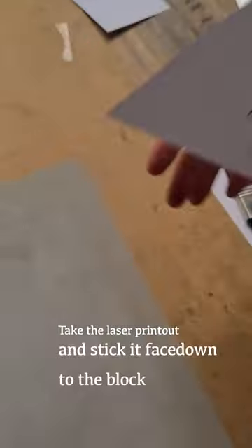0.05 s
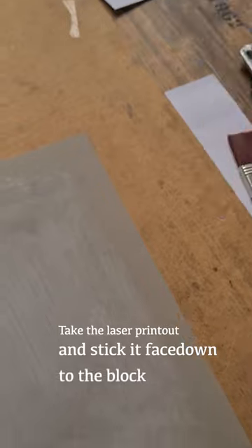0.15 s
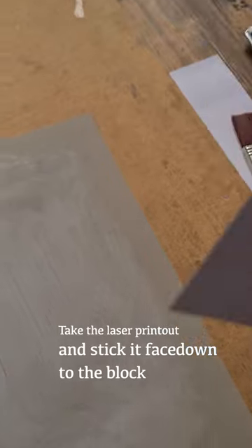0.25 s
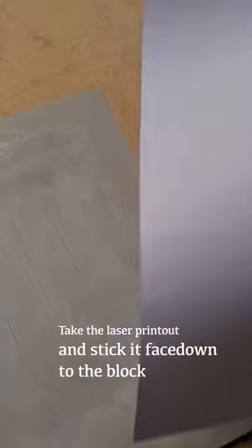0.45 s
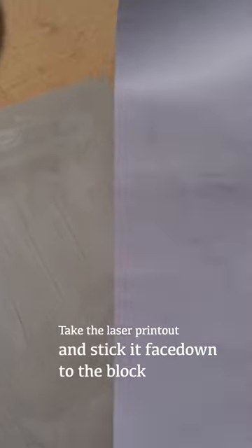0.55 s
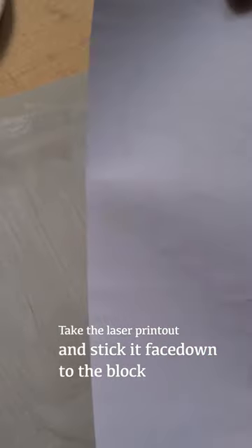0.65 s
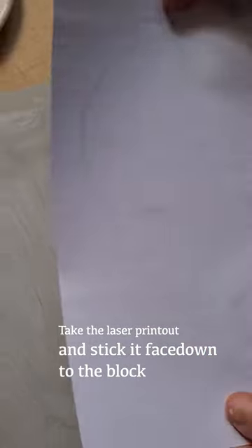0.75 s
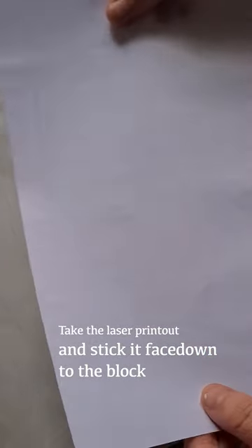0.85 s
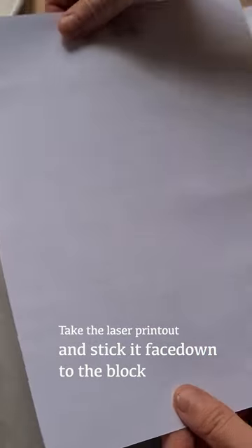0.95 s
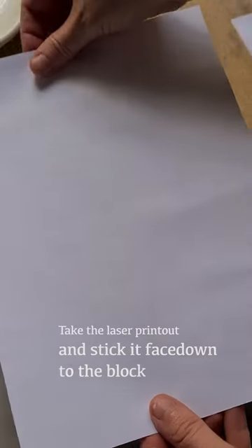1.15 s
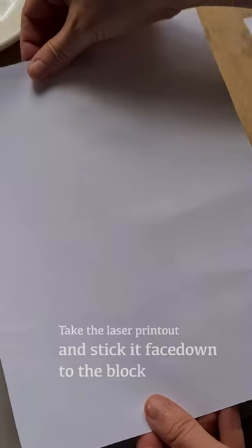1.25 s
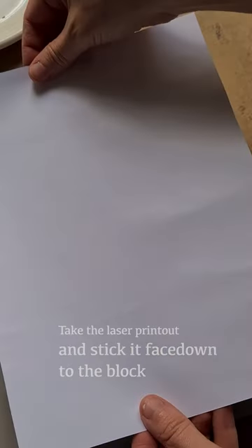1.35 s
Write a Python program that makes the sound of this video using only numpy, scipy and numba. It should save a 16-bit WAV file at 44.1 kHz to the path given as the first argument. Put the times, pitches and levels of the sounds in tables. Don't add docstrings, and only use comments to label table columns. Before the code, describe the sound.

Paper handling: a stiff sheet rustles, creases snap sharply, then it settles softly onto a block.

```python
import sys
import numpy as np
from scipy import signal
from scipy.fft import rfft, irfft
from scipy.io import wavfile
from scipy.ndimage import uniform_filter1d, map_coordinates
from numba import njit

SR = 44100
rng = np.random.default_rng(int(sys.argv[2]) if len(sys.argv) > 2 else 0)


def inscribe(sig):
    pcm = np.round(np.clip(np.atleast_2d(sig).T, -1, 1) * 32767)
    wavfile.write(sys.argv[1], SR, pcm.astype(np.int16))


def ratio_of_db(decibels):
    return 10 ** (np.asarray(decibels, float) / 20)


N = 61739


def curve(table, column):
    return np.interp(np.arange(N) / SR, np.array(table)[:, 0], np.array(table)[:, column])


def walk(rate):
    k = int(SR / rate)
    steps = np.repeat(rng.standard_normal(N // k + 1), k)
    return 1.44 * uniform_filter1d(uniform_filter1d(steps, k), k)[:N]


def coloured(x, points):
    hz = np.maximum(np.arange(N // 2 + 1) * SR / N, 1)
    corner_hz, db = np.array(points).T
    y = irfft(rfft(x) * ratio_of_db(np.interp(np.log(hz), np.log(corner_hz + 1), db)), N)
    return y / np.sqrt(np.mean(y ** 2))


def high(x, hz):
    return signal.sosfilt(signal.butter(2, hz, "high", fs=SR, output="sos"), x)


@njit
def band(x, hz, width, sr):
    y, b, l = np.empty(len(x)), 0., 0.
    for i in range(len(x)):
        g, k = np.tan(np.pi * hz[i] / sr), width / hz[i]
        v = (b + g * (x[i] - l)) / (1 + g * (g + k))
        b, l, y[i] = 2 * v - b, l + 2 * g * v, k * v
    return y


def resonance(x, hz, width):
    return band(x, np.full(N, 1. * hz), 1. * width, 1. * SR)


@njit
def ring(centre, hz, cycles, size, n, sr):
    y = np.zeros(n)
    for k in range(len(centre)):
        half = .5 * cycles[k] * sr / hz[k]
        for i in range(max(0, int(centre[k] - half) + 1), min(n, int(centre[k] + half) + 1)):
            d = i - centre[k]
            bell = np.cos(np.pi * d / (2 * half)) ** 2
            y[i] += size[k] * np.sin(2 * np.pi * hz[k] * d / sr + 1) * bell
    return y


def swarm(s, db, hz, rise_ms, fall_ms, spread, cycles, count):
    pitch_sag, level_spread_db = 0.3, 1.5
    u = rng.random((3, len(s), count))
    c = rng.standard_normal((len(s), count))
    rise, fall = 4 * np.abs(rise_ms)[:, None], 4 * np.abs(fall_ms)[:, None]
    ms = (np.arange(count) + u[0]) / count * (rise + fall) - rise
    strength = np.exp(-4 * np.where(ms < 0, -ms / rise, ms / fall))
    even = (np.arange(count) * (np.sqrt(5) - 1) / 2 + u[1, :, :1]) % 1
    pitch = hz[:, None] * strength ** pitch_sag * np.exp(spread * (2 * even - 1))
    pitch = np.clip(pitch, 100, .4 * SR)
    density = np.sqrt((rise + fall) * pitch / 1000 / count / cycles)
    size = ratio_of_db(db[:, None] + level_spread_db * c) * strength * density * np.sign(u[2] - .5)
    size = size * np.cos(np.pi * (even - .5)) ** .5
    at = (s[:, None] + ms / 1000) * SR
    halves = []
    for k in range(2):
        centre = at[:, k::2].ravel()
        halves.append(ring(centre, pitch[:, k::2].ravel(), cycles + 0. * centre,
                           size[:, k::2].ravel(), N, 1. * SR))
    return halves


# f/Hz, level/dB per Hz
ROOM_COLOUR = [
    (40, -1),
    (156, -11.5),
    (300, -10),
    (700, -17.5),
    (2300, -23),
    (7000, -32.5),
    (12700, -43),
    (12900, -85),
]
# t/s, level/dB
HISS_FADE = [
    (0, -1.5),
    (.08, -4.5),
    (.18, -9),
    (.3, 2.5),
    (.95, -1),
    (1.2, -6),
    (1.37, -5.5),
    (1.4, -7.5),
]
# f/Hz, width/Hz, level/dB
ROOM_PATCHES = [
    (1600, 560, -8),
    (2170, 520, 0.5),
    (3500, 890, -3.5),
    (6600, 1000, 1.5),
    (9700, 1300, -9.5),
]


def room():
    mid, side = (coloured(rng.standard_normal(N), ROOM_COLOUR) for _ in range(2))
    side = signal.sosfilt(signal.butter(1, 110, "high", fs=SR, output="sos"), side)
    both = mid + 0.78 * side * np.array([[1], [-1]])
    bass = signal.sosfilt(signal.butter(2, 300, fs=SR, output="sos"), both)
    hiss = both - bass
    patches = 0
    for hz, width, db in ROOM_PATCHES:
        patch = np.array([resonance(x, hz, width) for x in hiss])
        patches = patches + ratio_of_db(db + 5 * walk(18.04)) * patch
    bass = bass * ratio_of_db(1.3 * walk(14.7))
    hiss = (hiss + patches) * ratio_of_db(curve(HISS_FADE, 1) + 1.07 * walk(12.64))
    return ratio_of_db(-57.5) * (bass + hiss)


# t/s, pressure level/dB, air gap f/Hz
SLIDE = [(.2, -100, 2970), (.21, -69, 2960), (.3, -58, 3080), (.34, -56, 3000), (.41, -52.5, 3160),
         (.47, -44, 3250), (.505, -40, 3430), (.53, -60, 3440), (.59, -45.5, 3300), (.75, -45.5, 3290),
         (.88, -46.5, 3980), (.94, -50.5, 4350), (.965, -59, 3900), (1.05, -59, 4000), (1.108, -49.5, 4180),
         (1.125, -62, 3820), (1.3, -57, 4840), (1.36, -72.5, 4600)]
# f/Hz, level/dB per Hz
FIBRE_COLOUR = [
    (250, -7),
    (500, -15.5),
    (1200, -11.5),
    (2200, -12.5),
    (4000, -10.5),
    (7000, -11.5),
    (12000, -19),
    (15600, -26),
]


def slide():
    press = ratio_of_db(curve(SLIDE, 1) + 1.6 * walk(39.76))
    halves = []
    for _ in range(2):
        grit = rng.standard_normal(N) * ratio_of_db(2.2 * walk(400))
        halves.append(press * 0.47 * coloured(grit, FIBRE_COLOUR))
    return halves


# multiple of gap pitch, width/Hz, depth 0-1
NOTCHES = [
    (.68, 410, 0.7),
    (1.4, 630, 0.53),
    (2.4, 940, 0.6),
]


def under_sheet(x):
    hz = curve(SLIDE, 2)
    for multiple, width, depth in NOTCHES:
        x = x - depth * band(x, multiple * hz, 1. * width, 1. * SR)
    gap = band(x, hz, 520., 1. * SR)
    edge_hz = 6090 * (hz / 3320) ** 0.31
    edge = band(x, edge_hz, 590., 1. * SR)
    gap_level, edge_level = ratio_of_db(-0.5 + 3 * walk(60.1)), ratio_of_db(-2 + 3 * walk(60))
    return ratio_of_db(1.0) * (x + gap_level * gap + edge_level * edge)


CREASE_SPREAD, CREASE_CYCLES = 0.97, 4.5
# t/s, level/dB, f/Hz, fall/ms
TICKS = [(0.206, -42, 4230, 6.2), (.277, -40, 2280, 2.7), (0.2808, -30, 4060, 0.76), (0.354, -36, 3180, 4),
         (0.4949, -21, 4360, 4.1), (0.502, -23.5, 3850, 2.5), (0.508, -22, 3360, 5.14),
         (.547, -29, 3800, 1.04), (0.554, -25.5, 4540, 1.76), (.558, -28.5, 4130, 2),
         (.585, -35, 4000, 2.1), (0.61, -46, 9000, 0.92), (.81, -32, 3800, 1.2), (.978, -41, 3570, 4),
         (0.984, -38, 2920, 1.5), (1.058, -38.5, 4770, 1.6), (1.1143, -34, 5370, 0.98)]


def ticks():
    s, db, hz, fall_ms = np.array(TICKS).T
    rise_ms = 0.3975 + 0 * s
    return swarm(s, db, hz, rise_ms, fall_ms, CREASE_SPREAD, CREASE_CYCLES, count=160)


# t/s, peak level/dB, f/Hz, cycles
SNAPS = [(0.2078, -37.5, 160, 1.1), (.2155, -36, 2960, 6), (.218, -32.5, 1100, 3.4),
         (.2243, -28, 1990, 7.4), (.281, -40, 3000, 4), (.347, -41, 1300, 6.9), (.354, -36, 800, 1.6),
         (.3593, -29.5, 900, 1.5), (0.3647, -23, 1280, 4.8), (0.3644, -31.5, 383, 2.84),
         (.3697, -37, 704, 1.5), (.373, -35, 4000, 4), (.3748, -26, 1100, 2.2), (.389, -38.5, 2420, 8),
         (0.4951, -20, 6160, 8.2), (0.495, -22, 3180, 1.8), (0.4957, -28, 9260, 18), (.498, -28, 1460, 8.6),
         (.5025, -28, 4300, 4), (.5056, -29.5, 3000, 2.4), (.508, -22, 3500, 4.5), (.5125, -27, 2800, 6.6),
         (.518, -32, 1720, 5.5), (.554, -28, 3400, 2.5), (0.5541, -35.5, 6400, 7.3),
         (.559, -33.5, 3500, 12), (0.609, -29.5, 495, 1.8), (.609, -40, 1820, 5), (.619, -32, 700, 1.6),
         (.639, -27.5, 386, 3.5), (0.6384, -23.5, 1200, 3.1), (.6405, -27, 3000, 5.8),
         (0.6408, -27, 1900, 3.7), (.648, -27, 600, 2.5), (0.654, -29.5, 1500, 5), (.81, -37, 3070, 6.5),
         (.81, -37, 6400, 6.2), (0.915, -35, 1155, 10.7), (0.9855, -38, 2740, 8.2), (0.98, -46, 4100, 13),
         (0.9819, -39.5, 1300, 8.5), (0.9808, -45, 9200, 32), (.998, -50, 1200, 16), (.555, -42, 480, 4.3),
         (.484, -40, 1500, 19), (.626, -34, 600, 8), (.319, -47, 3000, 30), (.645, -35, 3600, 9),
         (1.058, -44, 5630, 8.9), (1.116, -44, 5870, 9.8)]


def snaps(low):
    s, db, hz, cycles = np.array(SNAPS).T
    return ring(s * SR, hz, cycles, ratio_of_db(db) * ((hz < 2000) == low), N, 1. * SR)


# t/s, level/dB, f/Hz
THUMPS = [(0.209, -45, 108.6), (.284, -53, 89), (0.35, -45.5, 112), (0.378, -43, 75.6), (.405, -50, 150),
          (0.476, -51, 71), (0.507, -48, 120), (0.591, -41.5, 66.6), (0.626, -36.5, 103), (0.757, -48, 83),
          (0.913, -53.5, 99), (.975, -53, 62), (1.035, -53, 55), (1.089, -53, 57), (1.16, -54, 60),
          (1.269, -55, 95), (1.33, -56, 70), (1.375, -58, 210)]


def thumps():
    s, db, hz = np.array(THUMPS).T
    late_s, cycles = 0.0113, 2
    puffs = ring((s + late_s) * SR, hz, cycles + 0. * s, ratio_of_db(db), N, 1. * SR)
    return puffs * ratio_of_db(np.array([[2.2], [-2.2]]))


# t/s, level/dB, top f/Hz, rise/ms, fall/ms
FLAPS = [(0.216, -24.5, 2340, 2.29, 10.5), (.255, -45, 1780, 8.6, 9.4), (0.226, -37, 460, 5.1, 13),
         (0.346, -38.5, 1300, 1.34, 3.9), (0.356, -26, 1300, 3.01, 3.75), (.631, -23.5, 920, 5, 2.93),
         (.374, -29, 1300, 5.5, 7), (0.39, -28, 2250, 3.6, 6.9), (.515, -30.5, 495, 8, 8),
         (0.497, -30.5, 2200, 1.27, 5.5), (.515, -28.5, 1900, 4, 5.7), (0.597, -30, 600, 8.1, 9.8),
         (0.609, -27, 1310, 2.2, 3.55), (.619, -26.5, 1010, 4, 8), (0.64, -22.5, 2670, 2.5, 5.1),
         (.651, -25, 1500, 4.5, 6.5), (0.665, -30, 696, 7.3, 10.7), (.746, -33.5, 860, 10.3, 4.5),
         (.758, -20.5, 1900, 2.46, 4.86), (0.766, -25.5, 1300, 1.98, 6.1), (.778, -34, 1070, 3.54, 9),
         (0.81, -34.5, 1120, 1.17, 3.26), (0.917, -31.5, 1230, 1.49, 4.23),
         (.93, -43, 775, 4.36, 10),
    (.981, -39, 1500, 2.1, 5.15),
    (.999, -40.5, 1110, 3.7, 5),
]
# f/Hz, width/Hz, level/dB
SHEET_MODES = [
    (455, 100, 1.5),
    (600, 25.5, 4),
    (1130, 290, 0.5),
    (1599, 67, 0),
    (2120, 370, 4),
]


def flaps():
    s, db, hz, rise_ms, fall_ms = np.array(FLAPS).T
    halves = []
    for x in swarm(s, db, hz, rise_ms, fall_ms, spread=0.94, cycles=3.4, count=240):
        modes = sum(ratio_of_db(level) * resonance(x, f, width) for f, width, level in SHEET_MODES)
        halves.append(x + modes)
    return halves


# t/s, level/dB, f/Hz, rise/ms, fall/ms
SCRAPES = [
    (.488, -36.5, 4500, 11, 6),
    (0.23, -43, 2560, 1.9, 5),
    (1.108, -45.5, 4900, 14, 3),
    (.979, -39.5, 6700, 4, 4),
]


def scrapes():
    return swarm(*np.array(SCRAPES).T, CREASE_SPREAD, CREASE_CYCLES, count=400)


# t/s, lead of left port/ms, left over right level/dB
PLACE = [
    (0, 0.41, 19),
    (.27, 0.31, -4.5),
    (.45, 0.27, 6),
    (.7, 0.28, 0),
    (.93, 0.3, 2),
    (1.03, -0.3, 2),
    (1.12, -0.31, -2),
    (1.17, 0.14, 3),
    (1.4, 0.099, 1.5),
]


def ports(halves, middle, share):
    whole = halves[0] + halves[1] + middle
    apart = ratio_of_db(-4.5) * high(halves[0] - halves[1], 600)
    lead, i = share * curve(PLACE, 1) * SR / 2000, np.arange(N)
    left = map_coordinates(whole + apart, [i + lead], mode="mirror")
    right = map_coordinates(whole - apart, [i - lead], mode="mirror")
    return np.array([left, right])


def room_tail(near):
    t60_s = 0.11
    t = np.arange(int(.2 * SR)) / SR
    tail = rng.standard_normal((2, len(t))) * np.exp(-np.log(1000) * t / t60_s) * (t > .002)
    tail = tail / np.sqrt(np.sum(tail ** 2, axis=1, keepdims=True))
    return ratio_of_db(-12) * signal.fftconvolve(high(near, 325), tail, axes=1)[:, :N]


def scene():
    bright = np.array([slide(), scrapes(), ticks()]).sum(axis=0)
    bright = [under_sheet(x) for x in bright]
    body = ratio_of_db(-3) * np.array(flaps())
    near = ports(body, snaps(True), 0.46) + ports(bright, snaps(False), 0.97)
    pan_db = curve(PLACE, 2)
    direct = near * ratio_of_db(np.array([pan_db, -pan_db]) / 2)
    return direct + room_tail(near) + thumps() + room()


def roll_off(x):
    return signal.sosfilt(signal.butter(12, 15710, fs=SR, output="sos"), x)


def record(dry):
    low_pass = signal.ellip(10, .2, 80, 15650, fs=SR, output="sos")
    mix = signal.sosfilt(low_pass, high(dry, 40.4))
    return roll_off(mix)


dry = scene()
out = record(dry)
inscribe(out)
```